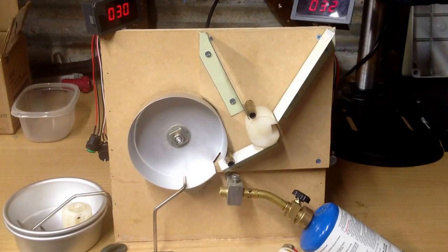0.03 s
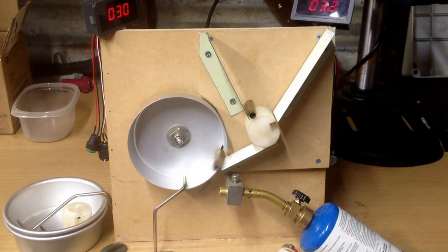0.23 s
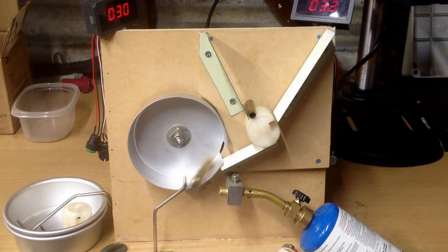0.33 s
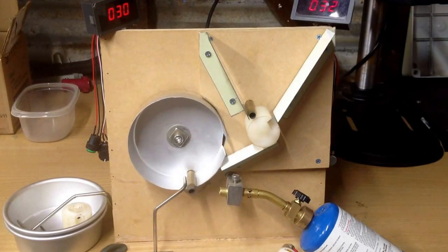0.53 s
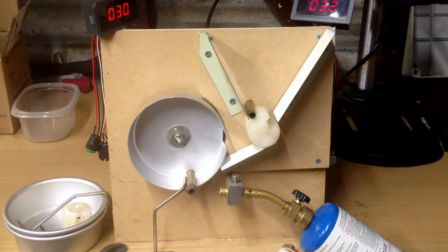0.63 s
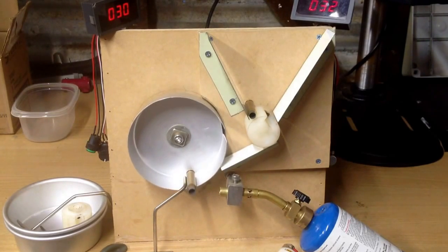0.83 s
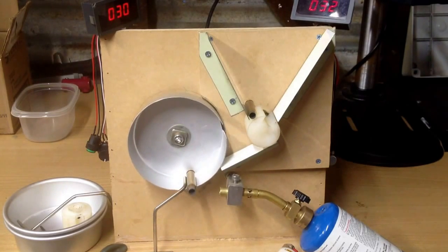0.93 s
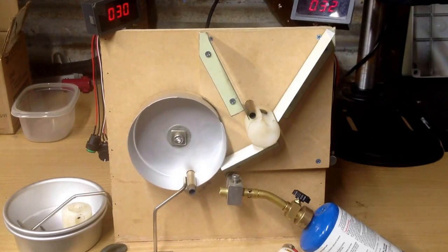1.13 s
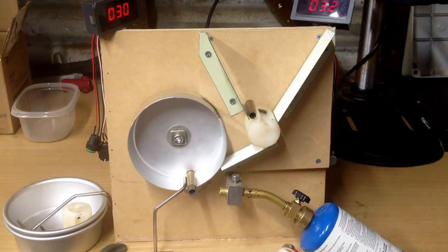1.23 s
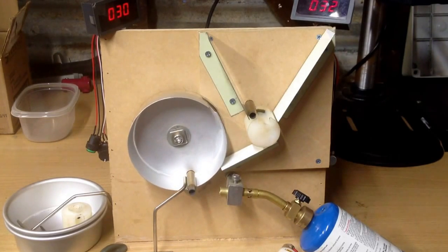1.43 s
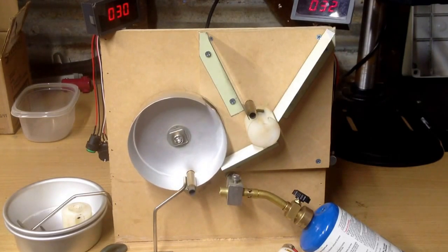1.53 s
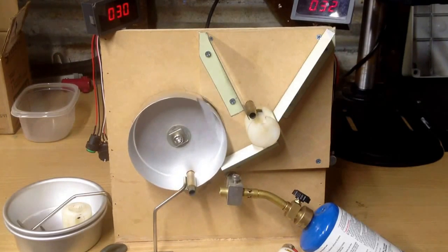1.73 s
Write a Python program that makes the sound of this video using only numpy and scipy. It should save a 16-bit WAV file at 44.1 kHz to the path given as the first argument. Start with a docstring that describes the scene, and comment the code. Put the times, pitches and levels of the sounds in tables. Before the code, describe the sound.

Sharp metallic clinks as a little brass case drops into a dish, over faint motor hum.

```python
"""Over a faint motor hum, a small brass case slides and clatters down a machine's feed chute.
It drops into a metal dish and rocks to rest, while the feed arm knocks against its stop.
Each impact is a brief broadband pulse plus the free decay of the struck bodies' normal modes:
three very high ones for the case, mostly lower ones for chute, dish and arm.
A small room reverberates after the pulses."""
import sys
import numpy as np
from scipy import signal
from scipy.fft import rfft, irfft, next_fast_len
from scipy.io import wavfile
from scipy.ndimage import map_coordinates

SR = 44100
rng = np.random.default_rng(int(sys.argv[2]) if len(sys.argv) > 2 else 0)


def digitize_waveform(pressure):
    """Quantize a signal to 16-bit integers and store it at the path in sys.argv[1].

    Rows of a 2-D input are taken as channels; values are limited to [-1, 1].
    """
    field = np.atleast_2d(pressure).T
    bounded = np.clip(field, -1, 1)
    quanta = np.round(bounded * 32767).astype(np.int16)
    wavfile.write(sys.argv[1], SR, quanta)


N = 79380

# Room reverberation. Each row: frequency in Hz, T60 (time to decay by 60 dB) in seconds.
ROOM_DECAY = [(200, 0.32), (1500, 0.41), (5000, 0.38), (14000, 0.25)]
# Motor hum. Each row: frequency in Hz, level in dB before the swell.
HUM_PARTIALS = [(84, -78), (125, -70), (167, -70.5), (195, -67), (300.5, -56), (452, -68), (815, -62.5)]
# Envelopes of the motor's hum and whirr. Each row: time in seconds, gain in dB.
HUM_SWELL = [(0, 1.5), (.3, 3.5), (.55, -3.5), (.85, -4), (1.1, -0.5), (1.4, 3.5), (1.8, -1.5)]
WHIRR_ENVELOPE = [(0, -46), (.3, -43.5), (.62, -49.5), (.9, -45.5), (1.2, -46.5), (1.5, -47), (1.8, -45)]
# Spectra of the gear, sliding and impact noises. Each row: frequency in Hz, relative level in dB.
WHIRR_SPECTRUM = [(25, -42.5), (55, -28.5), (90, -18.5), (160, -3), (220, -8), (350, -10), (550, -4.5),
                  (850, 1.5), (1150, -1), (1700, -9), (3200, -17.5), (4200, -16), (4800, -13), (5600, -22),
                  (8000, -22.5), (11000, -36.5), (15000, -35.5)]
SLIDE_SPECTRUM = [(50, -50), (3000, -14), (5000, -6), (12500, 3), (15500, -10)]
CHUTE_SPECTRUM = [(50, -40), (150, -20.5), (450, -9), (900, -8), (1400, 5), (2800, -1.5), (4500, 6),
                  (6000, 0.5), (10500, -0.5), (14500, 0.5), (15600, -5)]
ARM_SPECTRUM = [(50, -42), (200, -25), (1100, 1), (2100, 4), (3200, -7), (4500, -3), (7000, -11.5),
                (15000, -10)]
DISH_SPECTRUM = [(50, -43), (300, -16), (800, -5.5), (1500, -2.5), (2400, 1), (3300, 3.5), (5100, 5),
                 (6500, -4), (15000, -27)]  # its many short-lived modes, merged
TICK_SPECTRUM = [(50, -51), (200, -21), (1000, -12.5), (2000, -11.5), (3500, -6.5), (5500, -1), (8000, 3),
                 (11000, -7.5), (14500, -8), (15700, -17)]
# Normal modes. Each row: frequency in Hz, relative level in dB, T60 in seconds.
CHUTE_LOW_MODES = [(1406, 3, 0.11), (1448, -7.5, .44), (1790, -11.5, 0.42), (2546, -18, 0.39)]
CHUTE_HIGH_MODES = [(3545, -11, 0.23), (4495, -7, 0.37), (4590, -5.5, 0.17), (4970, -6.5, 0.42),
                    (6150, -26, .2), (6300, -11, 0.19), (7990, -8.5, 0.15), (10610, -13.5, 0.39),
                    (13100, -16, .25)]
ARM_MODES = [(1790, -9, 0.15), (2020, 0.5, 0.13), (2950, -11, 0.27), (6750, -9, 0.33), (9150, -4.5, 0.194)]
DISH_MODES = [(1541, -2.5, 0.24), (5065, -2, .15)]
DISH_PING = [(5124, 6.5, 0.024)]
# Modes of the brass case. Each row: frequency in Hz, T60 in seconds before a contact's decay factor.
CASE_MODES = [(10105, 0.71), (13130, 0.55), (14322, 0.56)]
# Case on chute. Each row: start in seconds, gains in dB of low modes, high modes and transient.
CHUTE_IMPACTS = [(0.2007, -26, -24.5, -17), (0.3064, -19.5, -29.5, -20.5), (0.3259, -43, -30.5, -22.5),
                 (0.3311, -24, -29, -22), (0.3444, -26, -30.5, -14), (0.3490, -28.5, -40, -24),
                 (0.359, -32, -31, -24.5)]
# Arm on stop. Each row: start in seconds, gains in dB of modes and transient.
ARM_IMPACTS = [(0.4075, -32, -29), (0.5350, -39, -30)]
# Case on dish. Each row: start in seconds, gains in dB of tick, dish and the case's low, middle
# and high mode, factor on the case's T60, flutter rate per second.
DISH_IMPACTS = [ (0.386, -12.5, -48, -26.5, -19, -8, 0.62, 200),
                (0.7035, -24.5, -33, -46, -48, -40, 0.96, 69.8),
                (0.7280, -36, -39.5, -40, -37.5, -49, 0.76, 50.6),
                (0.9270, -19, -39.5, -45, -54, -16, 0.66, 84.6),
                (0.9630, -34, -43.5, -34.5, -35, -43, 0.56, 45.5), (1.0741, -26, -40, -46, -54, -36, 1, 51),
                (1.1335, -29.5, -52, -30, -31.5, -25.5, 0.69, 44.7),
                (1.2212, -31.5, -64, -61, -56, -34, 0.62, 35.7),
                (1.2421, -33, -46.5, -44.5, -53, -42, 0.5, 35.4),
                (1.2829, -41.5, -50, -62, -54, -55, 0.42, 35.6),
                (1.3308, -24, -60, -35.5, -27.5, -30, 0.98, 39.9),
                (1.4260, -28, -56, -45.5, -41, -33, 0.65, 35),
                (1.4967, -34.5, -57, -41.5, -38, -52, 0.42, 30.7),
                (1.5483, -38.5, -66, -39, -43, -60, 0.36, 29.3)]
# The landing case chatters on the rim. Each row: start in seconds, tick gain in dB.
RIM_CHATTER = [(0.3866, -5), (0.3876, -14), (0.3890, -16.5)]


def amp(db):
    """Amplitude grows tenfold for every 20 dB."""
    return 10 ** (np.asarray(db) / 20)


def unit_rms(x):
    """Normalisation to a mean power of 1."""
    return x / np.sqrt(np.mean(np.abs(x) ** 2) + 1e-20)


def seconds():
    """Uniform sampling: the time of every sample."""
    return np.arange(N) / SR


def along(points, hz):
    """Interpolation of (Hz, value) points on a logarithmic frequency axis."""
    knot_hz, values = np.transpose(points)
    return np.interp(np.log(hz + 1), np.log(knot_hz + 1), values)


def wobble(rate):
    """Low-pass noise: a smooth curve through `rate` random values a second."""
    t = seconds()
    coarse = t[::16]
    curve = map_coordinates(rng.standard_normal(2048), [coarse * rate], mode="wrap")
    return np.interp(t, coarse, curve)


def phasor(rate):
    """Complex low-pass noise, which modulates both amplitude and phase."""
    return wobble(rate) + 1j * wobble(rate)


def coloured(x, spectrum):
    """Minimum-phase filtering imposes a spectrum causally, at unit power gain."""
    size = next_fast_len(2 * N)
    gain = unit_rms(amp(along(spectrum, np.fft.rfftfreq(size, 1 / SR))))
    cepstrum = irfft(np.log(gain), size)
    cepstrum[1:size // 2] *= 2  # fold onto positive time
    cepstrum[size // 2 + 1:] = 0
    return irfft(rfft(x, size) * np.exp(rfft(cepstrum)), size)[:N]


def add(track, start_s, sound):
    """Superposition of a delayed sound on a track."""
    start = round(start_s * SR)
    track[start:] += sound[:N - start]


def ring(modes, flutter, depth, attack_s):
    """Damped modes decay exponentially; movement and reflections modulate each at random."""
    t, out = seconds(), np.zeros(N)
    for hz, db, t60 in modes:
        decay = amp(-60 * t / t60) * (1 - np.exp(-t / attack_s))
        modulation = phasor(flutter) + 0.4 * phasor(flutter * 3.2)  # slow swell, fast shimmer
        envelope = decay * (1 + depth * modulation)
        envelope *= np.linalg.norm(decay) / np.linalg.norm(envelope)
        out += amp(db) * np.sqrt(2) * np.imag(envelope * np.exp(2j * np.pi * hz * t))
    return out


def room_tail():
    """Diffuse reverberation: noise of unit energy, each frequency decaying at its own rate."""
    hz, t, bands = signal.stft(rng.standard_normal(N), SR, nperseg=256)
    decay = amp(-60 * t / along(ROOM_DECAY, hz)[:, None])
    tail = signal.istft(bands * decay, SR, nperseg=256)[1][:N]
    return tail / np.linalg.norm(tail)


def transient(spectrum, t60, room_db):
    """A brief contact excites a broad band: a pulse, a noise burst, then reverberation."""
    decay = amp(-60 * seconds() / t60)
    strength = np.linalg.norm(decay)
    burst = rng.standard_normal(N) * decay
    burst *= strength / np.linalg.norm(burst)
    burst[0] = strength * 0.55 * np.exp(-t60 / 0.02)  # longer contacts put less into the pulse
    return coloured(burst + amp(room_db) * strength * room_tail(), spectrum)


def motor():
    """Slightly unsteady rotation gives a tonal hum; gears add broadband whirr and narrowband whine."""
    t, hum = seconds(), np.zeros(N)
    for hz, db in HUM_PARTIALS:
        peak = np.sqrt(2) * amp(db + 1.24 * wobble(6.2))
        jitter_s = 0.00025 * wobble(4.83)
        hum += peak * np.sin(2 * np.pi * hz * (t + jitter_s))
    hum *= amp(np.interp(t, *np.transpose(HUM_SWELL)))
    whirr = unit_rms(coloured(rng.standard_normal(N), WHIRR_SPECTRUM))
    whine = unit_rms(np.real(phasor(190) * np.exp(2j * np.pi * 4680 * t)))  # centred on 4680 Hz
    whirr_db = np.interp(t, *np.transpose(WHIRR_ENVELOPE)) + 0.86 * wobble(13.9)
    return hum + amp(-63.5) * whine + amp(whirr_db) * whirr


def slide(peak_s=0.14, width_s=0.025, peak_db=-58):
    """Sliding friction of brass on the chute makes a faint hiss before the first impact."""
    swell = np.exp(-((seconds() - peak_s) / width_s) ** 2)
    hiss = unit_rms(coloured(rng.standard_normal(N), SLIDE_SPECTRUM))
    return amp(peak_db) * swell * hiss


def feed_arm():
    """Impact excitation: the arm falls back on its stop and rings with a dull knock."""
    out = np.zeros(N)
    for start_s, ring_db, knock_db in ARM_IMPACTS:
        ringing = amp(ring_db) * ring(ARM_MODES, flutter=66, depth=0.65, attack_s=0.0011)
        knock = amp(knock_db) * transient(ARM_SPECTRUM, t60=0.023, room_db=3.5)
        add(out, start_s, ringing + knock)
    return out


def chute():
    """Free vibration: the chute rings in its low and high modes after each blow from the case."""
    out = np.zeros(N)
    for start_s, low_db, high_db, crack_db in CHUTE_IMPACTS:
        low = amp(low_db) * ring(CHUTE_LOW_MODES, flutter=91, depth=0.92, attack_s=0.0019)
        high = amp(high_db) * ring(CHUTE_HIGH_MODES, flutter=67.7, depth=0.72, attack_s=0.0008)
        crack = amp(crack_db) * transient(CHUTE_SPECTRUM, t60=0.019, room_db=4)
        add(out, start_s, low + high + crack)
    return out


def case_in_dish(rest_s=1.58, damping_db_per_s=107):
    """Each impact divides its energy differently among the modes; settling damps the vibration."""
    out = np.zeros(N)
    for start_s, tick_db, dish_db, *mode_dbs, decay_factor, flutter in DISH_IMPACTS:
        modes = [(hz, db, t60 * decay_factor) for (hz, t60), db in zip(CASE_MODES, mode_dbs)]
        brass = ring(modes, flutter, depth=0.88, attack_s=0.0017)
        dish = ring(DISH_MODES, flutter=164, depth=1.16, attack_s=0.00044)
        dish += ring(DISH_PING, flutter=180, depth=0.3, attack_s=0.00031)
        dish += amp(-0.5) * transient(DISH_SPECTRUM, t60=0.014, room_db=7)
        tick = transient(TICK_SPECTRUM, t60=0.0057, room_db=-2.5)
        add(out, start_s, brass + amp(dish_db) * dish + amp(tick_db) * tick)
    for start_s, tick_db in RIM_CHATTER:
        add(out, start_s, amp(tick_db) * transient(TICK_SPECTRUM, t60=0.0016, room_db=-6.5))
    return out * amp(-damping_db_per_s * np.maximum(seconds() - rest_s, 0))


def scene():
    """Linear superposition: the pressures of all sources add at one microphone."""
    return (slide() + chute() + case_in_dish() + feed_arm() + motor())[None]


def record(dry):
    """Band limiting: an ideal low-pass filter removes everything above its cutoff."""
    size, cutoff_hz = next_fast_len(2 * N), 15700
    passband = np.fft.rfftfreq(size, 1 / SR) < cutoff_hz
    return irfft(rfft(dry, size) * passband, size)[..., :N]


dry = scene()
out = record(dry)
digitize_waveform(out)
```